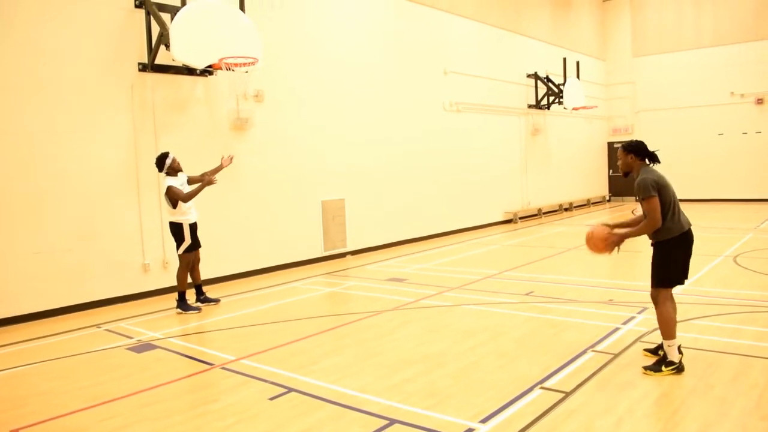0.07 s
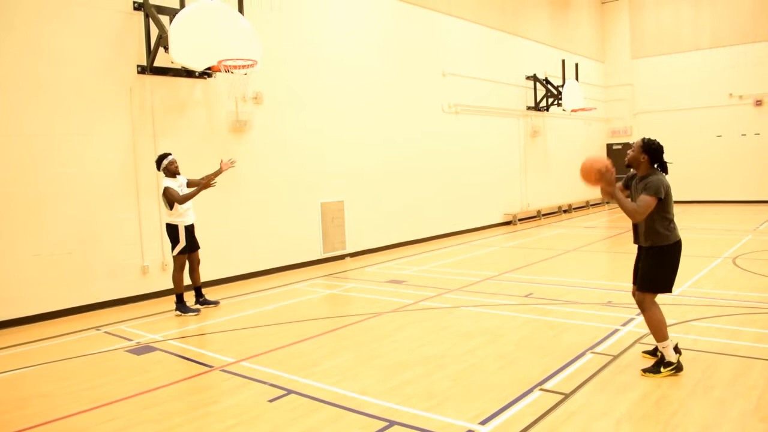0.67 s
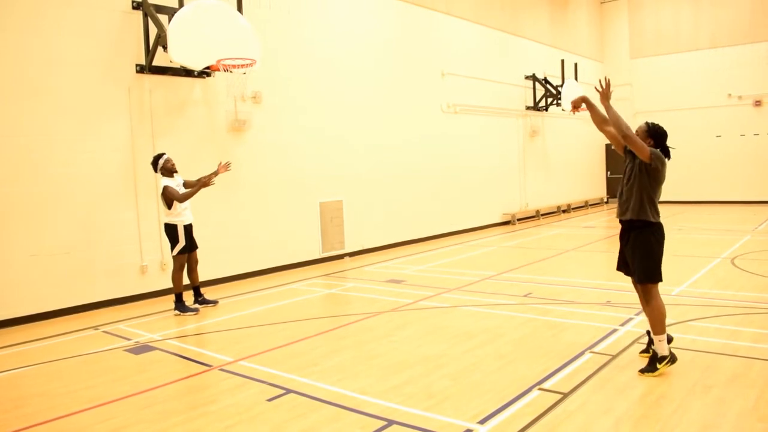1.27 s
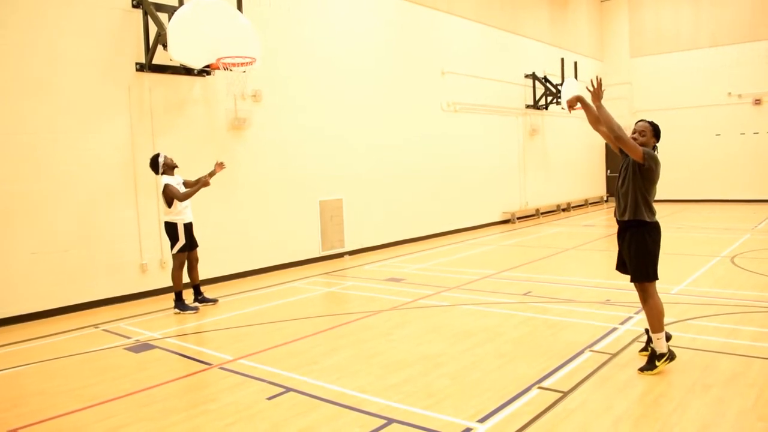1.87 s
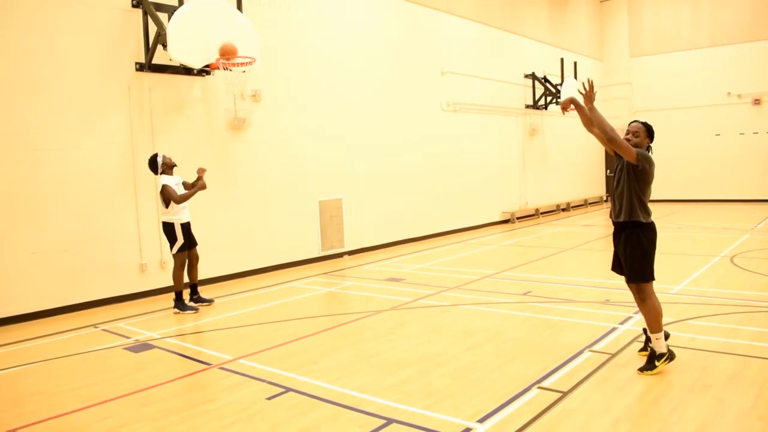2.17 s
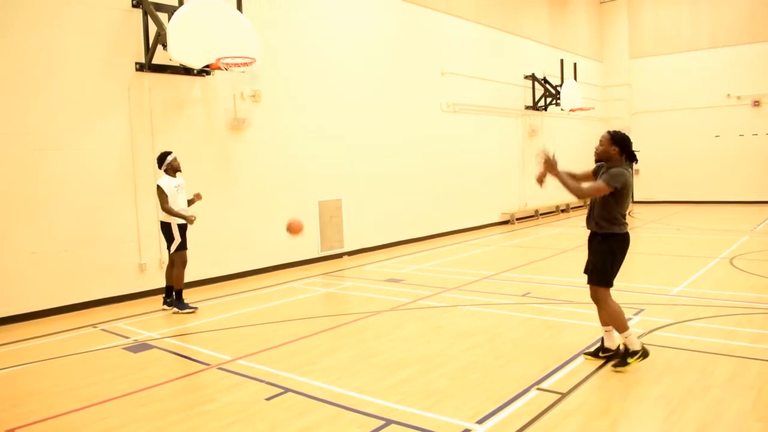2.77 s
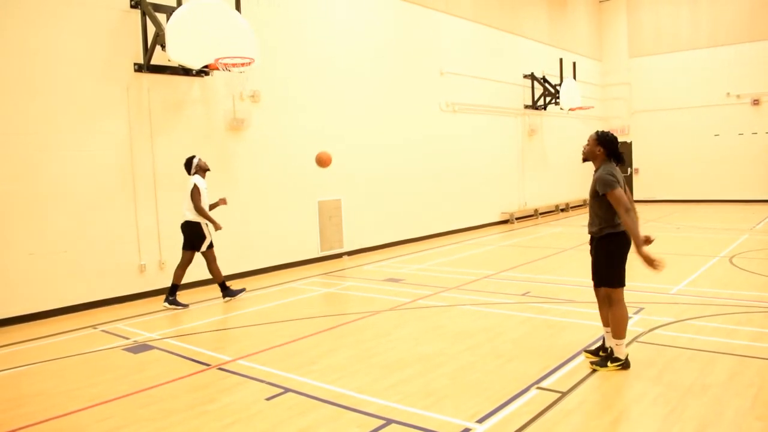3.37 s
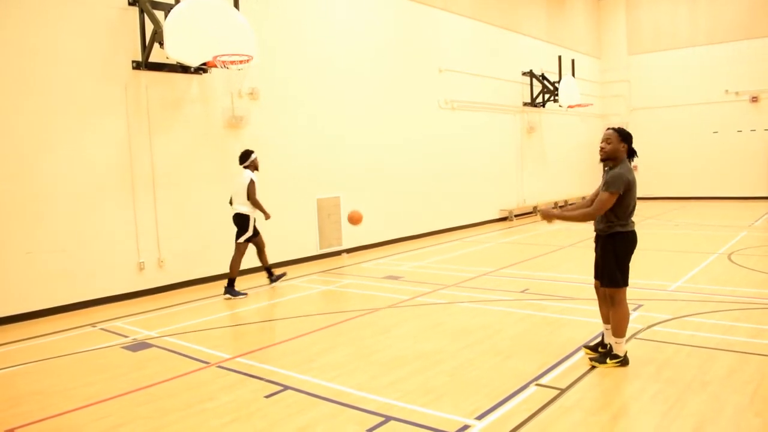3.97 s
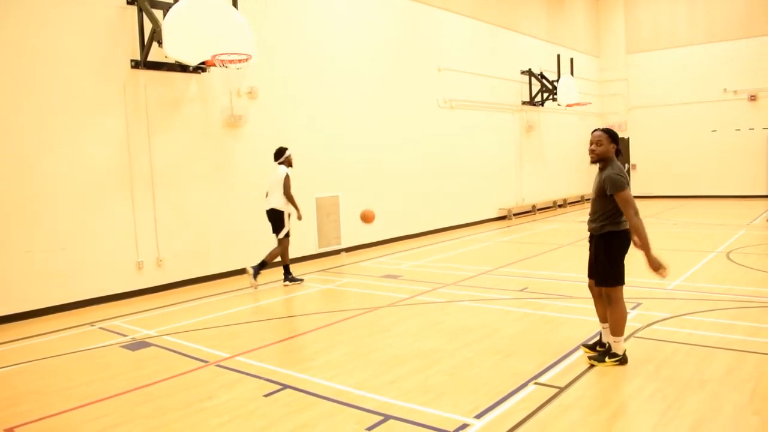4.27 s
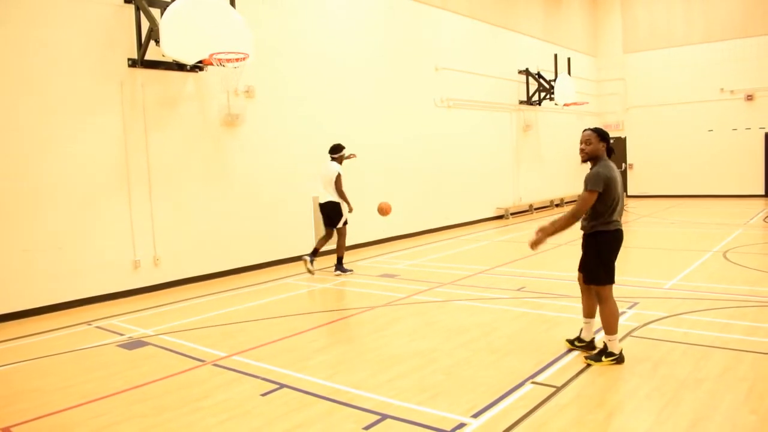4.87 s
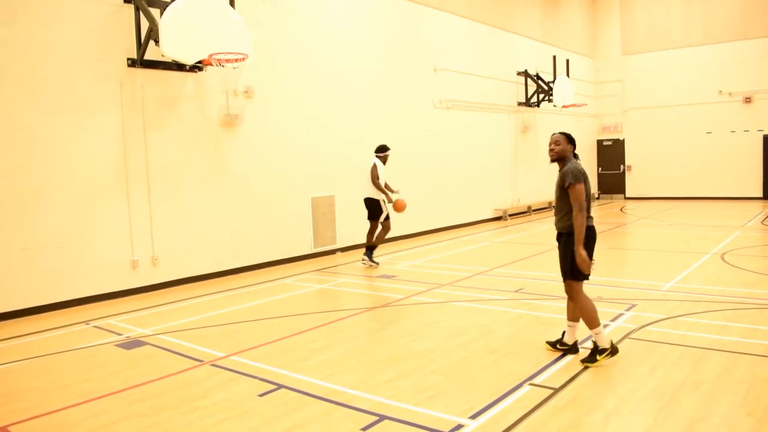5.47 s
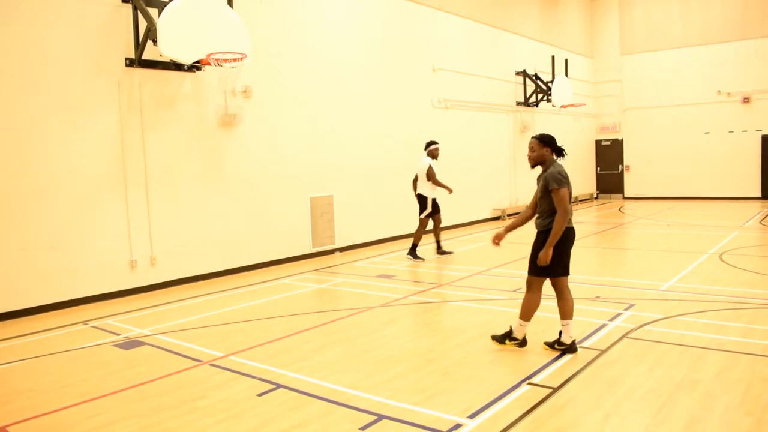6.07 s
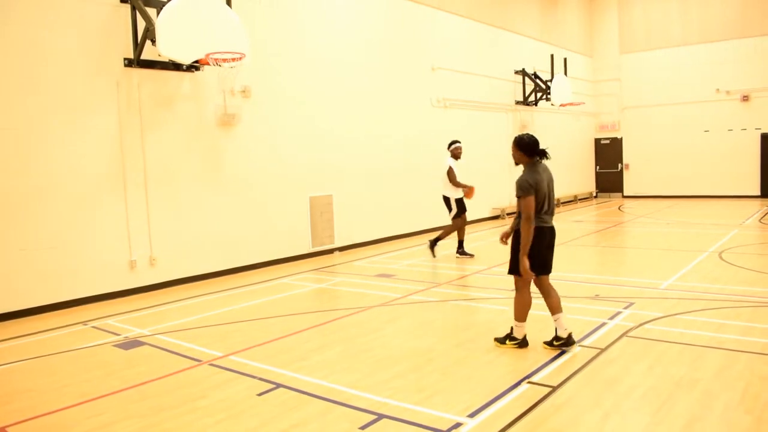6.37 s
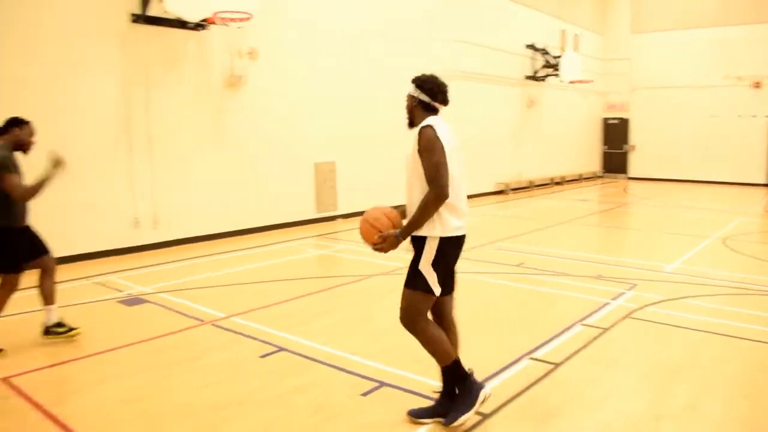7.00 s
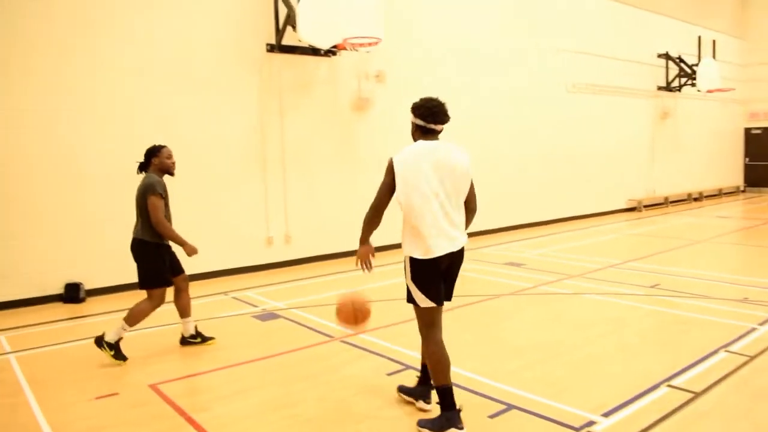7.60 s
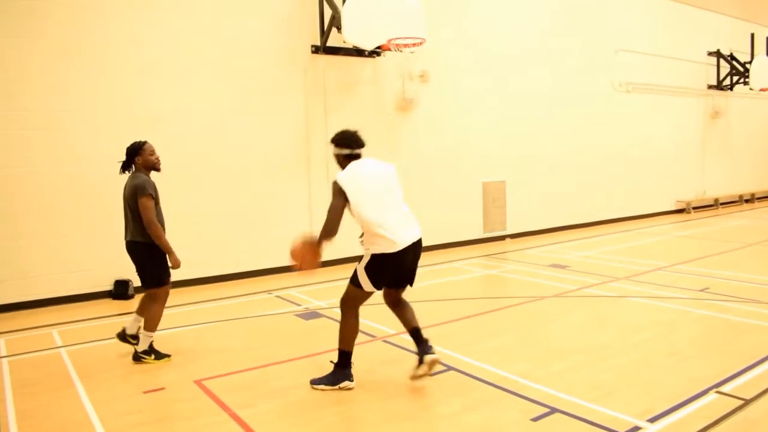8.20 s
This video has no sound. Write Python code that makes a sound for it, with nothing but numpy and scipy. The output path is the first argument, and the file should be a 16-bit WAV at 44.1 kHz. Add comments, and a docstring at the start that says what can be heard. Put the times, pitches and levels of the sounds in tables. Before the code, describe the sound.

In a big echoing gym with steadily humming ventilation, one basketball bounce is followed by a short metallic rattle of the hoop. The ball drops and bounces away on the wooden floor four times, with hollow smacks coming closer together. After a brief dropout the room fades back, and soft hand pats, a faint rustle of clothing and one firm bounce sound nearer the microphone.

```python
"""A basketball bounce rings through a large gym over the rush and hum of the ventilation.
A shot strikes the hoop and rattles its loose mount; the ball drops and bounces away on the hardwood.
At each bounce the shell snaps, ball and inner air ring, the sprung floor thumps and the walls echo.
The sound cuts out briefly and fades back in; close by, clothes brush, palms pat, one dribble lands."""
import sys
import numpy as np
from scipy import signal
from scipy.fft import rfft, irfft, next_fast_len
from scipy.io import wavfile
from scipy.ndimage import uniform_filter1d, minimum_filter1d

SR = 44100
rng = np.random.default_rng(int(sys.argv[2]) if len(sys.argv) > 2 else 0)


def master_out(mix):
    """Clip the mix to full scale and print it as 16-bit PCM to the path in sys.argv[1]."""
    frames = np.transpose(np.atleast_2d(mix))
    ceiling = np.clip(frames, -1, 1)
    pcm = np.round(ceiling * 32767).astype(np.int16)
    wavfile.write(sys.argv[1], SR, pcm)


N = 363384
LEAD = SR // 4   # samples before t = 0, so the hall already rings
HALL_SAMPLES = 5 * SR // 2


def from_db(db):
    return 10 ** (np.asarray(db) / 20)


def unit_rms(x):
    return x / np.sqrt(np.mean(x ** 2) + 1e-20)


def at_hz(points, hz):
    """Table lookup on a log-frequency axis."""
    f, value = np.transpose(points)
    return np.interp(np.log(np.maximum(hz, 1)), np.log(f), value)


def coloured(x, spectrum):
    """Zero-phase EQ from rows of f/Hz, gain/dB."""
    n = x.shape[-1]
    size = next_fast_len(n)
    gain = from_db(at_hz(spectrum, np.fft.rfftfreq(size, 1 / SR)))
    return irfft(rfft(x, size) * gain, size)[..., :n]


def butter(x, hz, kind, order=1):
    return signal.sosfilt(signal.butter(order, min(hz, .45 * SR), kind, fs=SR, output="sos"), x + 1e-18)


def clicks(rows, size):
    """Single-sample blows from rows of t/s, level/dB."""
    out = np.zeros(size)
    for t, db in rows:
        out[max(round(t * SR), 0)] += from_db(db)
    return out


def ring(force, modes, pitch=1):
    """Damped resonators from rows of f/Hz, level/dB, t60/s."""
    out = 0
    for hz, db, t60_s in modes:
        r = from_db(-60 / (t60_s * SR))
        w = 2 * np.pi * hz * pitch / SR
        mode = signal.lfilter([1, 0, -1], [2, -4 * r * np.cos(w), 2 * r * r], force + 1e-18)
        out = out + from_db(db) * mode
    return out


def snap(force, low_hz, soft_hz, top_hz):
    """Pressure spike, rounded by the give of the rubber."""
    spike = butter(force, low_hz, "high")
    rounded = butter(spike, soft_hz, "low")
    return butter(rounded, top_hz, "low", order=2)


def add(track, at_s, sound):
    """Mix into a track that starts LEAD samples early."""
    at = LEAD + round(at_s * SR)
    part = sound[..., :track.shape[-1] - at]
    track[..., at:at + part.shape[-1]] += part


# Diffuse-field width: f/Hz, side re mid/dB
WIDTH = [(40, -8), (70, -25.5), (130, -47.5), (250, -24.5), (500, -17), (1000, -20.5), (2000, -12),
         (4000, -10), (8000, -3), (14000, 5)]
def diffuse(size):
    """Stereo noise from all around: narrow in the bass, wide in the treble."""
    mid, side = rng.standard_normal((2, size))
    return mid + coloured(side, WIDTH) * [[1], [-1]]


# Duct air spectrum: f/Hz, density/dB
DUCT_AIR = [(30, -40.5), (62, -19.5), (100, -3.5), (145, -4.5), (210, -13.5), (320, -6.5), (450, -9),
            (650, -2.5), (1000, -3.5), (1600, -6), (2300, -14.5), (4200, -21.5), (5800, -23), (9300, -39.5),
            (13000, -67)]
# Fan tones: f/Hz, level/dB
FAN_TONES = [(156.1, -56.5), (419.9, -41), (559.9, -45.5), (699.8, -45), (839.8, -53), (5706, -69)]
def ventilation(air_db=-39, waver=0.069, waver_per_s=6):
    """Air rushes in the ducts; the fan tones waver slightly."""
    t = np.arange(N) / SR
    out = from_db(air_db) * unit_rms(coloured(diffuse(N), DUCT_AIR))
    for hz, db in FAN_TONES:
        drift = np.interp(t * waver_per_s, np.arange(200), rng.standard_normal(200))
        out += from_db(db) * np.sqrt(2) * (1 + waver * drift) * np.sin(2 * np.pi * hz * t)
    return out


# Hall decay before air absorption: f/Hz, t60/s
HALL_T60 = [(70, 6.45), (140, 2.55), (300, 3.41), (600, 4.98), (1200, 2.93), (2200, 1.89), (4000, 1.97),
            (7000, 1.56)]
# Hall colour: f/Hz, gain/dB
HALL_COLOUR = [(35, -47.5), (65, -36.5), (100, -28.5), (140, -31.5), (230, -33.5), (320, -34), (480, -33),
               (800, -38.5), (1300, -34.5), (2500, -35), (4500, -36), (6500, -37), (9000, -33),
               (14000, -30.5)]
def hall(sound, build_s=0.023, absorption_hz=7860, absorption_power=3.03):
    """Dense reflections build and die away; the air soaks up the treble first."""
    hz, t, cells = signal.stft(diffuse(HALL_SAMPLES), SR, nperseg=512)
    inverse_t60 = 1 / at_hz(HALL_T60, hz) + (hz / absorption_hz) ** absorption_power
    _, tail = signal.istft(cells * from_db(-60 * t * inverse_t60[:, None]), SR)
    build = 1 - np.exp(-(np.arange(tail.shape[1]) / SR / build_s) ** 2)
    response = coloured(tail, HALL_COLOUR) * build
    return signal.fftconvolve(response, sound[None], axes=1)[:, :len(sound)]


# Straight-path colour: f/Hz, gain/dB
DIRECT_COLOUR = [(170, -1), (270, -1.5), (400, 0), (680, -3), (1000, 1.5), (2100, 1), (2750, -1.5),
                 (3700, -0.5), (7000, 0.5)]
def direct(sound, scatter_db=-22, scatter_s=0.0031, near_db=-38, near_s=0.0088):
    """Straight path, plus scatter around the listener and, duller, off floor and players."""
    t = np.arange(SR // 10) / SR
    noise = butter(diffuse(len(t)), 540, "high")
    scatter = from_db(scatter_db) * np.exp(-t / scatter_s) * noise
    scatter += from_db(near_db) * np.exp(-t / near_s) * butter(noise, 9000, "low", order=4)
    sound = coloured(sound, DIRECT_COLOUR)
    return sound + signal.oaconvolve(scatter, sound[None], axes=1)[:, :len(sound)]


# Fabric brushes: peak t/s, level/dB, half-width/s
BRUSHES = [(7.366, -55.5, 0.11), (7.732, -51.5, 0.037)]
# Fabric spectrum: f/Hz, density/dB
CLOTH = [(300, -18), (1200, -4), (4500, 0), (9000, -6), (14000, -23)]
def clothes():
    """Fabric brushes in bell-shaped swells as the player walks past."""
    t = np.arange(N) / SR
    envelope = sum(from_db(db) * np.exp(-((t - at_s) / width_s) ** 2) for at_s, db, width_s in BRUSHES)
    return envelope * unit_rms(coloured(diffuse(N), CLOTH))


# Ball modes: f/Hz, level/dB, t60/s
BALL_MODES = [(1076, -29.5, 0.0066), (1165, -24, 0.022), (1264, -22, 0.015), (1360, -23, 0.015),
              (1530, -23.5, 0.015), (1640, -31.5, 0.01), (1880, -34.5, 0.0064)]
def ball_ring(force, pitch=1):
    """The struck ball rings briefly."""
    return ring(force, BALL_MODES, pitch)


# Palm contacts: t/s, level/dB
PATS = [(6.5312, -25), (7.272, -21.5), (7.7424, -36)]
# Air trapped under the palm: f/Hz, level/dB, t60/s
PALM_MODES = [(2055, -2, 0.0066), (2780, -9, 0.0059), (3250, -8, 0.0057)]
def hands(slap_db=11, ring_db=-10):
    """Palms slap the ball; trapped air and ball ring."""
    out = np.zeros(LEAD + N)
    for at_s, db in PATS:
        force = clicks([(0, db), (0.0029, db - 22)], SR // 10)
        slap = from_db(slap_db) * snap(force, low_hz=1490, soft_hz=2500, top_hz=4060)
        trapped_air = butter(ring(force, PALM_MODES), 4400, "low", order=2)
        add(out, at_s, slap + trapped_air + from_db(ring_db) * ball_ring(force))
    return out


# Hoop and backboard modes: f/Hz, level/dB, t60/s
HOOP_MODES = [(273, -14, 0.052), (332, -4, 0.031), (440, -6.5, 0.022), (516, 0.5, 0.024), (626, -1, 0.018),
              (716, 1.5, 0.026), (847, 4, 0.022), (987, 3.5, 0.022), (1123, -1, 0.039), (1246, -0.5, 0.035),
              (1470, -9.5, 0.027), (1810, -12.5, 0.017), (2090, -25.5, 0.014), (2750, -26.5, 0.014),
              (3900, -21.5, 0.0042), (7200, -15.5, 0.0007)]
def hoop_ring(force):
    """Hoop and backboard ring together."""
    return ring(force, HOOP_MODES)


def chatter(t, hits, rise_s=0.0042, burst_s=0.04, shiver_db=-21.5, shiver_s=0.13):
    """Force envelope in the loose mount: a quick burst and a faint shiver per hit, summed in power."""
    power = 0
    for at_s, _, db, _ in hits:
        age = np.maximum(t - at_s, 0)
        rise = 1 - np.exp(-age / rise_s)
        decay = np.exp(-age / burst_s) + from_db(shiver_db) * np.exp(-age / shiver_s)
        power = power + (from_db(db) * rise * decay) ** 2
    return np.sqrt(power)


def rattle(envelope, knocks_per_s=2500, ring_db=-22.5, clank_db=-6):
    """One loose joint knocks at random into hoop and board, too softly to reach the top octave."""
    knocks = rng.random(len(envelope)) < knocks_per_s / SR
    force = knocks * rng.choice([-1, 1], len(envelope)) * envelope
    clank = from_db(clank_db) * snap(force, low_hz=500, soft_hz=1500, top_hz=6000)
    metal = butter(from_db(ring_db) * hoop_ring(force) + clank, 225, "high", order=4)
    dulled = butter(metal, 2000, "low")
    return butter(dulled, 8700, "low", order=10)


# Backboard thud: f/Hz, level/dB, t60/s
BACKBOARD_MODES = [(185, -24, 0.045), (278, -14.5, 0.047), (365, -13.5, 0.037)]
def rim_strike(force, zing_db=-8, zing_s=0.04, ring_db=-17):
    """The ball snaps on the rim, the steel's crowded high modes zing, the board thuds."""
    t = np.arange(len(force)) / SR
    steel = rng.standard_normal(len(t)) * np.exp(-t / zing_s)
    zing = butter(signal.fftconvolve(force, steel)[:len(t)], 10000, "low", order=6)
    crack = snap(force + from_db(zing_db) * zing, low_hz=300, soft_hz=2500, top_hz=8200)
    return crack + from_db(ring_db) * hoop_ring(force) + ring(force, BACKBOARD_MODES)


# Ball on the rim: t/s, strike/dB, chatter/dB, strike low-pass/Hz
RIM_HITS = [(2.154, -8, -9.5, 13500), (2.179, -8.5, 1, 12530), (2.205, -9, 1.5, 10030),
            (2.276, -21, -14, 8000), (2.304, -13.5, -1.5, 3000), (2.325, -14, -4, 8000)]
def hoop(joints=4, rattle_db=-3, hall_db=-1.5, flex_hz=66.5, flex_db=-45.5, flex_t60_s=12):
    """Rim hits shake the mount and flex the board. Returns straight sound and a hall feed per joint."""
    straight, hall_feeds = np.zeros(LEAD + N), np.zeros((joints, LEAD + N))
    start_s = RIM_HITS[0][0]
    force = sum(butter(clicks([(at_s - start_s, db)], SR), top_hz, "low", order=8)
                for at_s, db, _, top_hz in RIM_HITS)
    strike = rim_strike(force)
    add(straight, start_s, -strike)
    shaking = chatter(start_s + np.arange(SR) / SR, RIM_HITS)
    for feed in hall_feeds:
        joint = rattle(shaking)
        add(straight, start_s, from_db(rattle_db) * joint / np.sqrt(joints))
        add(feed, start_s, from_db(hall_db) * (joint - strike) / np.sqrt(joints))
    flex = ring(clicks([(0.0068, 0.0023)], N), [(flex_hz, flex_db, flex_t60_s)])
    add(straight, start_s, butter(flex, 200, "low"))
    return straight, hall_feeds


# Sprung-floor modes: f/Hz, level/dB, t60/s
FLOOR_MODES = [(142, -19, 0.038), (164, -14, 0.043)]
# Floorboard modes: f/Hz, level/dB, t60/s
BOARD_MODES = [(254.5, -18, 0.051), (394, -21.5, 0.029), (446, -35, 0.18), (665, -26, 0.013)]
def floor_thump(push, thump_db, boards_db):
    """The ball's weight rings the sprung floor and its boards."""
    weight = butter(butter(push, 1700, "low"), 126, "high", order=2)
    return from_db(thump_db) * ring(weight, FLOOR_MODES) + from_db(boards_db) * ring(weight, BOARD_MODES)


def board_swing(db, hz=399.2, peak_s=0.013, half_width_s=0.0051):
    """The boards right under the ball swing for a few strong cycles."""
    t = np.arange(SR // 8) / SR
    return from_db(db) * np.sin(2 * np.pi * hz * t) * np.exp(-((t - peak_s) / half_width_s) ** 2)


# Air inside the ball: f/Hz, level/dB, t60/s
CAVITY_MODES = [(950, -26, 0.036), (1440, -26, 0.06), (1565, -24.5, 0.073), (2140, -30, 0.06)]
def hollow_ping(push, ping_hz, ping_db, air_db, t60_s=0.07):
    """Round again, the ball sounds its strongest mode and the air inside rings with it."""
    return ring(push, [(ping_hz, ping_db, t60_s)]) + from_db(air_db) * ring(push, CAVITY_MODES)


# Pebbled rubber skin: f/Hz, level/dB, t60/s
RUBBER_MODES = [(3490, -11.5, 0.0021), (4650, -22.5, 0.0014), (5700, -31, 0.0025), (7000, -25.5, 0.0028)]
def shell_crack(push, snap_db, rubber_db):
    """The shell meets the wood: a pressure spike and a short ring of the skin."""
    spike = snap(push, low_hz=470, soft_hz=1700, top_hz=8400)
    return from_db(snap_db) * spike + from_db(rubber_db) * ring(push, RUBBER_MODES)


# Shell snaps while flattening: t after touch/s, crack/dB, ball ring/dB
SNAPS = [(0, 6.5, 4), (0.0041, 4.5, 0.5), (0.0064, 4, 3.5), (0.0098, 0.5, -0.5)]
# Flattened patch of shell: f/Hz, level/dB, t60/s
SMACK_MODES = [(1020, -20, 0.0073)]
def bounce(force_db, snap_db, rubber_db, boards_db, ring_db, pitch, contact, growth_db, hall_db,
           near_s, far_s, echo_db, ping_db, ping_hz, air_db, smack_db, thump_db,
           yield_s=0.0095, release_s=0.0133, shell_db=6):
    """The ball flattens, the floor yields, the ball springs free. Returns straight sound and hall feed."""
    push = clicks([(0.00017, 0)], SR // 8)
    crack = shell_crack(push, force_db + snap_db + 15, force_db + rubber_db)
    smack = from_db(force_db + smack_db) * ring(push, SMACK_MODES)
    body = from_db(force_db + ring_db) * butter(ball_ring(push, pitch), 2550, "low", order=2)
    hollow = hollow_ping(push, ping_hz, ping_db - 18, air_db)
    floor = floor_thump(push, force_db + thump_db, force_db + boards_db)
    swing = board_swing(force_db + boards_db - 20)

    straight = np.zeros(LEAD + SR // 3)
    for k, (after_s, crack_db, body_db) in enumerate(SNAPS):   # inner air is damped while pressed flat
        slap = from_db(crack_db - 6) * (crack + smack) + from_db(body_db - 4) * body
        add(straight, after_s * contact, -from_db((k - 1.5) * growth_db) * slap)
    add(straight, 0, swing - from_db(-10) * floor)   # slight give at first touch
    add(straight, yield_s * contact, floor)
    add(straight, release_s * contact, from_db(-8) * body + from_db(-3) * hollow)

    wall_echo = butter(-from_db(shell_db) * (crack + from_db(-5) * body), 8400, "low", order=2)
    add(straight, near_s, from_db(echo_db) * wall_echo)
    add(straight, far_s, from_db(echo_db - 5) * wall_echo)

    shell = -from_db(shell_db) * (crack + body + from_db(-3) * smack)
    released = np.pad(hollow, (round(release_s * contact * SR), 0))[:len(push)]
    return straight, from_db(hall_db) * (shell + floor + released + from_db(-4) * swing)


# Ball on the floor: t/s, force/dB, snap/dB, rubber/dB, boards/dB, ball ring/dB, ring pitch/ratio,
# contact time/ratio, growth per snap/dB, hall/dB, near wall delay/s, far wall delay/s, wall echo/dB,
# ping/dB, ping f/Hz, inner air/dB, smack/dB, thump/dB
BOUNCES = [(-0.03, 3, 0.5, -25, 2.5, -1, 1.0, 0.52, 2, -1.5, 0.065, 0.092, -11.5, 5, 1165, -3.5, -3.5, 0.28),
           (2.9782, 3.5, 3, -9, 2, -6, 0.92, 1.01, -0.5, 0, 0.041, 0.09, -9.5, 2.5, 1158, -1.5, 3, 0.27),
           (4.1791, -0.5, 1.5, 0.5, -2.5, 5.5, 1.1, 0.98, -2.5, -1.5, 0.028, 0.092, -10.5, 4, 1237, -1, -5.5, 1.3),
           (5.1585, -6, 6, -11, 1.5, -0.5, 0.99, 1.01, 0.5, 1, 0.036, 0.087, -11, -4, 1213, -6, 1, 0.032),
           (5.7690, -2, 3.5, -2, -5, -7.5, 0.945, 0.98, 4.5, -0.5, 0.029, 0.085, -11.5, -8, 1110, 0.5, 6.5, 0.18),
           (6.60, -1.5, 2, -11, 2, 1, 0.82, 1, 0, -3.5, 0.05, 0.066, -13, -6, 1170, 2, -3, 0.27),
           (7.783, 5.5, 0.5, 4, 4.5, -1.5, 0.97, 0.8, -5.5, -5, 0.0233, 0.037, -12.5, 5, 1185, 4, -9, 1.5)]
def bounces():
    """Each bounce echoes off two walls and fills the hall from a new spot."""
    out = np.zeros((2, LEAD + N))
    for at_s, *settings in BOUNCES:
        straight, hall_feed = bounce(*settings)
        add(out, at_s, direct(straight)[:, LEAD:])
        add(out, at_s, hall(np.pad(hall_feed, (0, HALL_SAMPLES))))
    return out


def scene():
    """Ball, hands and hoop, straight and through the hall, over ventilation and clothes."""
    pats = hands()
    rim, joint_feeds = hoop()
    play = bounces() + direct(pats) + direct(rim) + hall(pats) + sum(hall(feed) for feed in joint_feeds)
    return play[:, LEAD:] + ventilation() + clothes()


def limiter(x, hold_s=0.0015):
    """Turns both sides down around peaks over full scale."""
    size = 2 * max(round(hold_s * SR / 2), 1) + 1
    allowed = 1 / np.maximum(np.abs(x).max(axis=0), 1)
    return x * uniform_filter1d(minimum_filter1d(allowed, size), size)


def dropout(mute_s=6.56, fall_db_per_s=2403, floor_db=-76, return_s=6.756, ramp_s=0.0025,
            faint_db=-25.5, swell_start_s=6.779, swell_s=0.37, full_db=0.23):
    """Gain curve: the sound cuts out, steps back faintly and swells along an S-curve."""
    t = np.arange(N) / SR
    falling = from_db(np.clip((mute_s - t) * fall_db_per_s, floor_db, 0))
    gate = np.clip(1 + (t - return_s) / ramp_s, 0, 1)
    swell = (1 - np.cos(np.pi * np.clip((t - swell_start_s) / swell_s, 0, 1))) / 2
    return falling + gate * from_db(faint_db + (full_db - faint_db) * swell)


# Stereo balance: f/Hz, left minus right/dB
BALANCE = [(200, 0), (380, 0.86), (690, 2.5), (1270, 1), (2350, 2), (4330, 1.1), (7970, 0.6), (14700, 2)]
def record(dry, gain_db=-1, cutoff_hz=15100):
    """Slight lean to the left, peak limiting, one dropout, steep low-pass."""
    left = coloured(dry[0], [(hz, db / 2) for hz, db in BALANCE])
    right = coloured(dry[1], [(hz, -db / 2) for hz, db in BALANCE])
    faded = limiter(from_db(gain_db) * np.array([left, right])) * dropout()
    return signal.sosfilt(signal.ellip(10, .2, 80, cutoff_hz, fs=SR, output="sos"), faded)


dry = scene()
out = record(dry)
master_out(out)
```